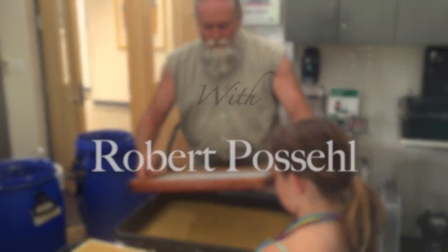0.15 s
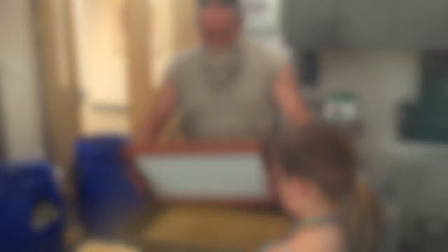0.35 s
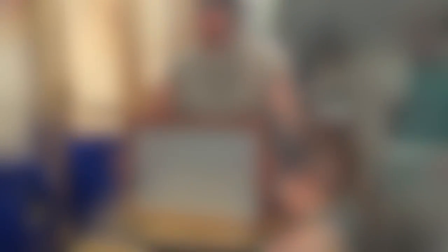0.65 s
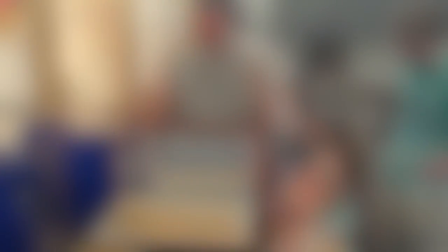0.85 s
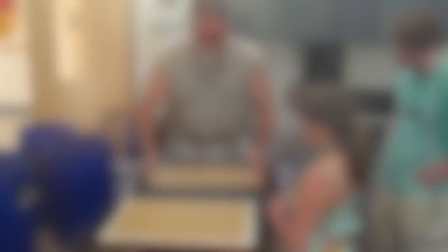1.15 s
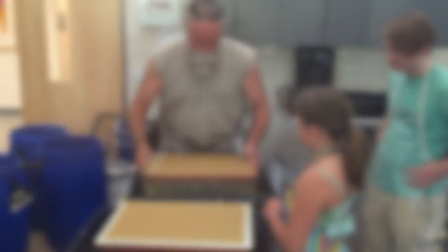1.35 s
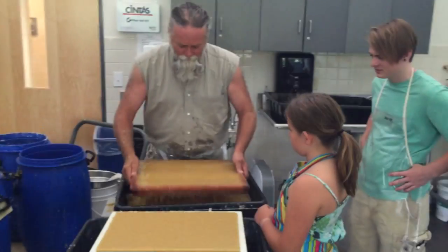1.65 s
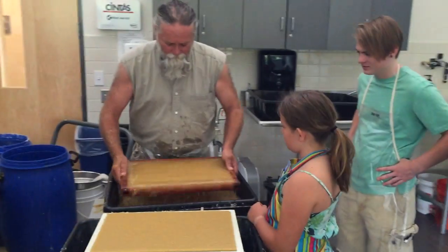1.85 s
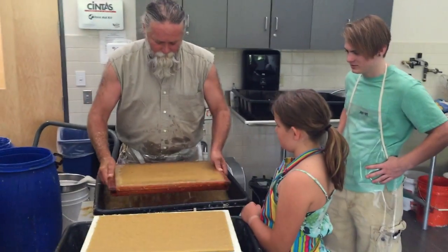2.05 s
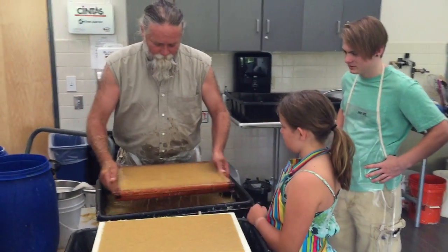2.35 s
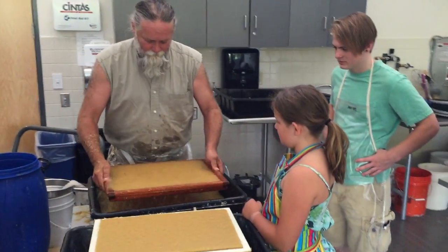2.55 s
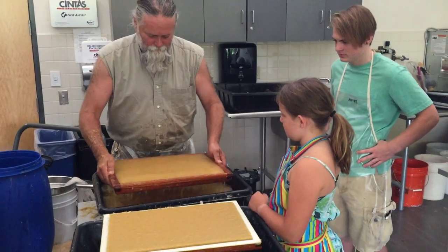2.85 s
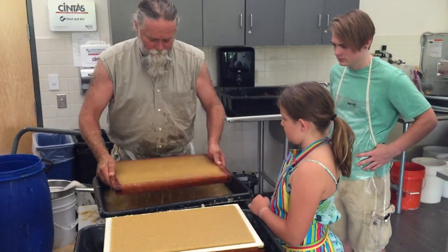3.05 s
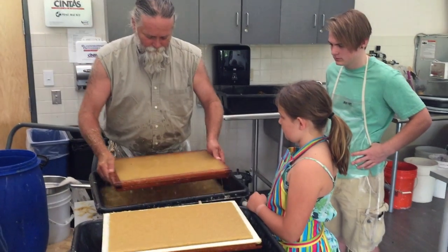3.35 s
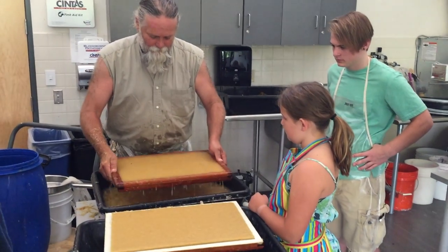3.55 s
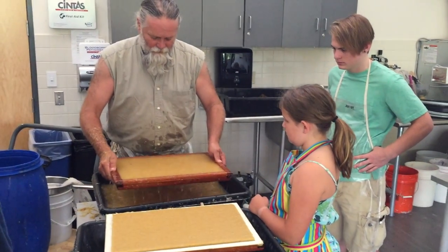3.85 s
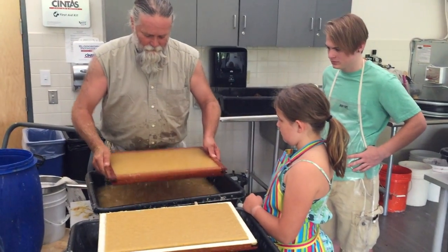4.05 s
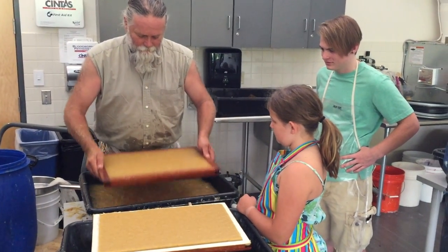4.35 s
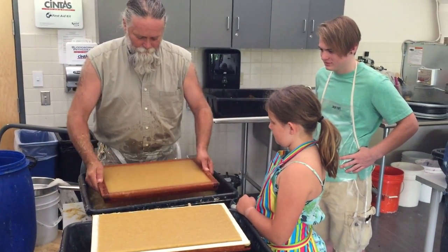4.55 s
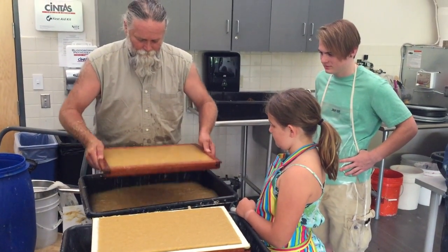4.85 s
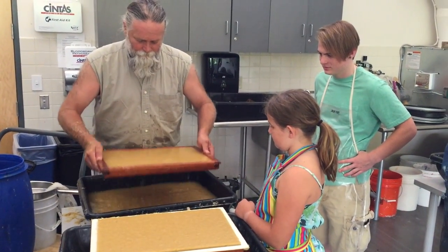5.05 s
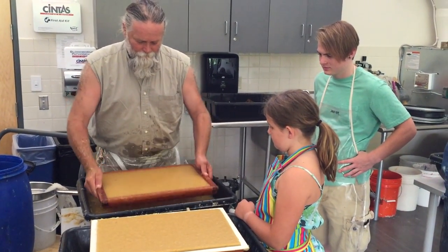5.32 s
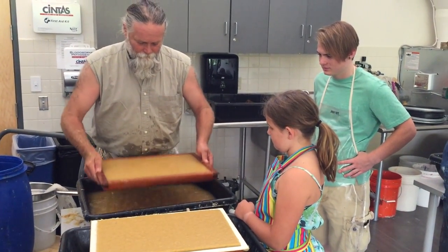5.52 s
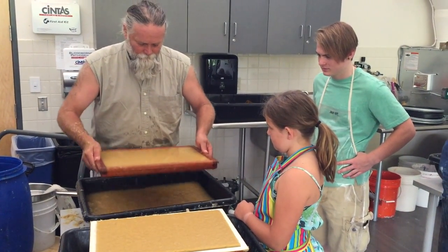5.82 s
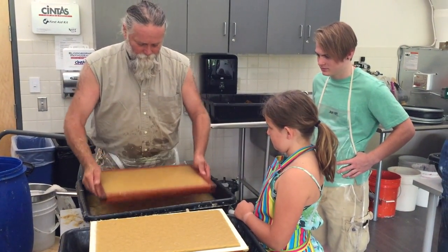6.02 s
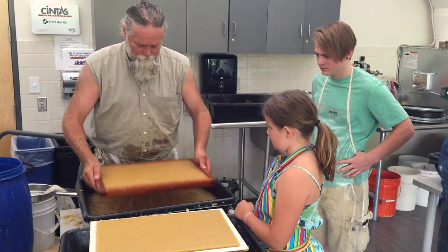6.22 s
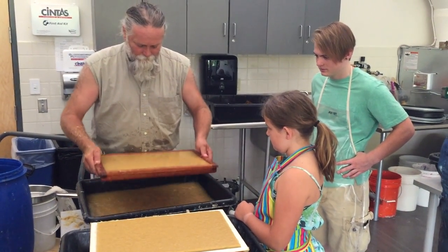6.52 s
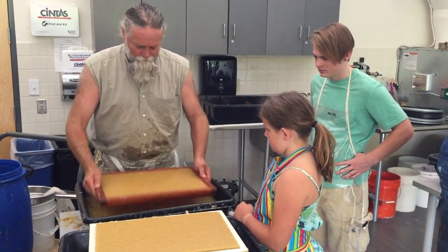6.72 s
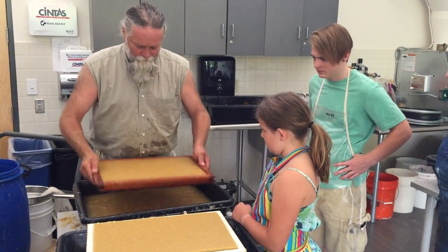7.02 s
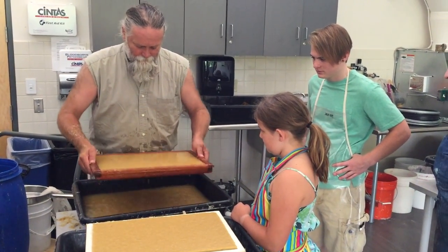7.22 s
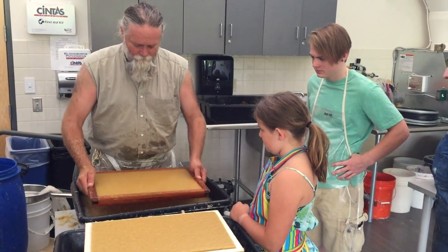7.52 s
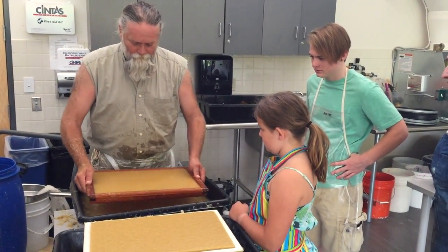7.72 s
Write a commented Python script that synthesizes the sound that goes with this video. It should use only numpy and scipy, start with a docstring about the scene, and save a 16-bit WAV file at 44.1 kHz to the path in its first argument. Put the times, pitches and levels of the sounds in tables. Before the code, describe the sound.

After near silence, a wooden papermaking frame comes up out of a plastic vat and water streams back in, bubbly and bright with fine spray and a few low gulps. The pour soon breaks into trickles and ringing drops, then sparse splashes with each shake, separated by quiet drips. Close microphone, small hard-walled workroom with short reverberation, faint low ventilation rumble and hiss.

```python
"""Papermaking mould over a vat

A papermaker's wooden mould is lifted out of a plastic vat of pulp in a hard-walled workroom.
Water streams back into the vat, then thins to a trickle: ringing bubbles babble, fine spray ticks.
Each shake of the frame throws off one more splash, made of extra bubbles and spray.
Single drops plink as lone bubbles, flat slaps crack as noise with a broad resonance.
Under it all, coloured noise makes a low ventilation rumble and a faint hiss."""
import sys
import numpy as np
from scipy import signal
from scipy.fft import rfft, irfft
from scipy.io import wavfile
from scipy.ndimage import uniform_filter1d

SR = 44100
rng = np.random.default_rng(int(sys.argv[2]) if len(sys.argv) > 2 else 0)


def inscribe(sig):
    """Save sig as 16-bit PCM at rate SR to the path in sys.argv[1].

    A 1-D sig is mono; a 2-D sig holds one channel per row.
    Samples are clipped to [-1, 1] before scaling.
    """
    pcm = np.round(np.clip(np.atleast_2d(sig).T, -1, 1) * 32767)
    wavfile.write(sys.argv[1], SR, pcm.astype(np.int16))


N = 347457  # length in samples

# All levels in the tables are before the gains of the final mix.

# Colour of the ventilation noise. Each row: frequency in Hz, relative level in dB per Hz.
VENTILATION_COLOUR = [(22, -27), (40, -6), (62, 0), (85, -1), (130, 3.5), (260, 0.5), (340, -6),
                      (450, -12.5), (900, -15), (2000, -16.5), (4000, -20), (8000, -25), (10500, -28),
                      (15500, -28)]
VENTILATION_DB, FADE_IN_S, FADE_POWER = -57.5, 1.03, 1.5

# Drops that trap one clear bubble. Each row: start in seconds, pitch in Hz, peak level in dB,
# time to fade by 60 dB in seconds.
DROPS = [(0.29, 1308, -54, 0.071), (0.388, 2990, -40.5, 0.016), (0.534, 1660, -29, 0.021),
         (0.633, 1560, -33.5, 0.023), (0.725, 1115, -42, 0.14), (0.843, 1140, -21, 0.027),
         (0.949, 1086, -21, 0.033), (0.987, 830, -18.5, 0.036), (1.174, 2180, -24.5, 0.029),
         (1.218, 1100, -22.5, 0.019), (1.241, 1520, -24, 0.027), (1.249, 2040, -19, 0.017),
         (1.293, 1275, -25, 0.03), (1.392, 2250, -23, 0.04), (1.426, 1440, -21.5, 0.029),
         (1.468, 2510, -11.5, 0.012), (1.509, 1666, -23.5, 0.037), (1.678, 2890, -24, 0.022),
         (1.751, 2200, -22.5, 0.05), (1.779, 1093, -16.5, 0.024), (1.892, 850, -23, 0.035),
         (1.987, 2130, -26, 0.035), (2.045, 1506, -23, .028), (2.066, 827, -20.5, 0.024),
         (2.212, 2370, -27, 0.057), (2.238, 1095, -25.5, 0.038), (2.284, 1856, -21, 0.032),
         (2.286, 2900, -24.5, 0.023), (2.335, 860, -29, 0.047), (2.349, 2210, -26, 0.027),
         (2.442, 3020, -29, 0.028), (2.461, 870, -29.5, 0.04), (2.527, 2760, -18, 0.014),
         (2.575, 869, -32, 0.066), (2.63, 1238, -33, 0.067), (2.682, 1600, -23.5, 0.025),
         (2.753, 2830, -29, 0.022), (2.797, 1250, -31.5, 0.051), (2.866, 1596, -20, 0.025),
         (2.893, 850, -30, 0.037), (2.906, 2230, -31, 0.018), (2.932, 745, -32.5, 0.062),
         (2.952, 1670, -32, 0.03), (2.995, 1500, -31, 0.033), (3.031, 3210, -27, .018),
         (3.06, 1474, -33, 0.1), (3.083, 1420, -38, 0.025), (3.083, 3650, -35, 0.018),
         (3.105, 1235, -31, 0.043), (3.135, 1520, -27.5, 0.037), (3.165, 887, -29.5, 0.039),
         (3.166, 2770, -28, 0.039), (3.258, 1760, -26.5, 0.033), (3.288, 2840, -31, .02),
         (3.365, 1180, -29, 0.026), (3.403, 1010, -27.5, 0.037), (3.516, 1785, -32.5, 0.034),
         (3.549, 1700, -30, 0.047), (3.578, 2950, -33, .018), (3.586, 990, -44, 0.35),
         (3.59, 1616, -25, 0.039), (3.664, 1600, -33, 0.023), (3.695, 2960, -28, 0.027),
         (3.717, 1845, -26.5, 0.032), (3.765, 1406, -30.5, 0.073), (3.81, 856, -31, 0.09),
         (3.818, 3920, -29.5, 0.019), (3.873, 3230, -23, 0.011), (3.95, 3620, -36.5, 0.032),
         (3.88, 722, -46, 0.37), (3.893, 1340, -30, 0.057), (3.916, 1270, -27, 0.038),
         (4.036, 1274, -38.5, 0.24), (4.078, 3470, -32, .018), (4.088, 1565, -27, 0.032),
         (4.117, 990, -26.5, 0.03), (4.132, 850, -23.5, 0.026), (4.174, 2900, -23.5, 0.015),
         (4.259, 4100, -30, 0.015), (4.275, 1410, -19, 0.01), (4.163, 1200, -33.5, 0.065),
         (4.331, 1000, -33, .09), (4.395, 887, -48, 0.083), (4.287, 985, -24, 0.032),
         (4.363, 926, -37.5, 0.14), (4.436, 1750, -28, 0.024), (4.452, 2230, -33, 0.019),
         (4.472, 2730, -38.5, 0.015), (4.519, 890, -48.5, 0.14), (4.911, 2760, -31, 0.01),
         (4.953, 2540, -34.5, 0.017), (5.056, 1360, -43.5, 0.024), (5.089, 1920, -36, 0.032),
         (5.094, 1405, -35.5, 0.024), (5.104, 3000, -34, 0.0094), (5.154, 1856, -34.5, 0.055),
         (5.165, 1190, -30.5, 0.017), (5.176, 1180, -29.5, 0.022), (5.186, 986, -36, 0.11),
         (5.227, 2590, -37, 0.028), (5.232, 1290, -32, 0.047), (5.24, 1030, -38, 0.12),
         (5.247, 1217, -23.5, 0.027), (5.253, 1630, -36, 0.018), (5.255, 2540, -39.5, 0.019),
         (5.262, 1440, -27.5, .022), (5.268, 1156, -31, 0.054), (5.293, 3350, -37.5, 0.037),
         (5.305, 1210, -33.5, 0.026), (5.425, 830, -38, 0.11), (5.455, 3340, -30.5, .018),
         (5.492, 3960, -30, 0.017), (5.619, 1760, -30, 0.028), (5.646, 1780, -29, 0.017),
         (5.91, 1005, -46, 0.055), (5.997, 1680, -37.5, 0.026), (6.101, 1017, -44.5, 0.13),
         (6.1, 1464, -42, 0.046), (6.1114, 3215, -27.5, 0.02), (6.191, 886, -37, 0.039),
         (6.209, 880, -34, 0.027), (6.231, 3080, -30.5, 0.032), (6.244, 1550, -28, 0.024),
         (6.253, 828, -31.5, 0.04), (6.332, 1260, -29, 0.036), (6.374, 1560, -35, 0.037),
         (6.418, 1610, -34.5, 0.017), (6.698, 1304, -32, 0.022), (6.754, 1240, -33.5, 0.019),
         (6.82, 1645, -39.5, 0.052), (6.905, 2270, -42, .024), (6.92, 2310, -31, 0.022),
         (6.928, 4080, -31.5, 0.018), (6.933, 1740, -28.5, 0.021), (6.946, 975, -33.5, 0.052),
         (6.949, 4300, -33, 0.018), (6.978, 3300, -27, 0.018), (7.028, 1570, -35, .03),
         (6.993, 1165, -29, 0.025), (7.078, 3370, -37, 0.02), (7.093, 1836, -39, 0.065),
         (7.11, 1770, -39, 0.033), (7.126, 2285, -34, 0.035), (7.157, 2240, -26.5, 0.012),
         (7.228, 1080, -40.5, 0.014), (7.296, 3830, -39, 0.016), (7.328, 1276, -46, 0.051),
         (7.381, 1558, -41, 0.049), (7.474, 1560, -34, 0.066), (7.483, 2930, -34, 0.017),
         (7.492, 3880, -34, 0.017), (7.502, 1250, -31, 0.069), (7.663, 2180, -34, 0.031),
         (7.675, 1750, -31, 0.021), (7.692, 810, -26, 0.033), (7.715, 1930, -23.5, 0.023),
         (7.757, 795, -32, 0.032), (7.794, 1190, -38, 0.03)]
# Most bubbles in a cloud hold their pitch roughly, a few more rise than sink:
# mean rise as a share of the spread.
RISE_BIAS = 0.15
# Droplets thrown up by a drop: latest return, pitch range above it, relative level, ring.
SPLASHBACK_S, SPLASHBACK_OCTAVES, SPLASHBACK_DB, SPLASHBACK_T60_S = 0.022, 1.1, -19, 0.0063
# A drop ticks on the surface as it lands: level and brightness relative to its bubble.
TOUCH_DB, TOUCH_PITCH_RATIO = -12, 1.18

# Blobs of water slapping the surface, the small ones brightest. Each row: start in seconds,
# level in dB, brightest frequency in Hz.
SLAPS = [(0.3875, -48, 2800), (0.407, -48, 2000), (0.431, -53, 5200), (0.5335, -37, 1700),
         (0.8435, -20, 1060), (0.87, -33, 5570), (0.944, -26.5, 6050), (0.9487, -15, 1050),
         (0.9752, -21.5, 4600), (1.175, -29, 2150), (1.2165, -17.5, 1060), (1.261, -20, 6100),
         (1.4235, -19, 3500), (1.424, -25, 12900), (1.4975, -24, 9600), (1.7435, -14, 1940),
         (1.891, -40, 4300), (1.9111, -19.5, 6200), (1.927, -25, 12900), (2.7813, -19, 2970),
         (3.0561, -18.5, 1490), (3.1295, -16.5, 2400), (3.1552, -26.5, 8700), (3.185, -21.5, 1900),
         (3.4017, -18.5, 1460), (3.402, -26.5, 7300), (3.564, -34, 6560), (3.695, -30, 5430),
         (3.82, -32.5, 4080), (4.02, -30, 1090), (4.021, -31, 3170), (4.0648, -26, 6640),
         (4.153, -30, 14000), (4.246, -31, 14500), (4.4345, -25.5, 1730), (4.661, -25, 2300),
         (5.134, -32.5, 8450), (5.229, -44, 1400), (5.247, -38, 1800), (5.263, -34.5, 9200),
         (5.4038, -31, 4550), (5.4186, -24.5, 13700), (6.102, -41, 4670), (6.1025, -36, 1300),
         (6.112, -35.5, 3400), (6.1852, -37, 9000), (6.2297, -25, 2200), (6.331, -37, 2980),
         (6.407, -36, 4770), (6.756, -55, 1890), (6.821, -54, 2000), (7.273, -38.5, 9000),
         (7.474, -34.5, 2600), (7.4919, -35.5, 3800), (7.503, -37, 2700), (7.644, -29, 3640),
         (7.6915, -34, 2100), (7.716, -24, 3020), (7.7608, -26.5, 8000)]
# Small bright drops crack with a clearer pitch. Each row: frequency in Hz,
# factor on the sharpness of the resonance (no unit).
CRACK_SHARPENING = [(1500, 1.32), (6200, 0.9), (8400, 5.4)]

# The unbroken stream swells as the mould comes up, then runs out. Each row: time in seconds,
# bubble level in dB, spray level in dB, commonest bubble pitch in Hz.
STREAM = [(0.378, -61.5, -80.5, 1490), (0.53, -56, -72, 1510), (0.719, -51.5, -62, 1040),
          (0.82, -50, -73, 990), (0.959, -39, -48, 960), (1.17, -38, -47.5, 1970),
          (1.39, -36.5, -42.5, 1900), (1.599, -33.5, -40.5, 2000), (1.71, -37.5, -43.5, 1780),
          (1.83, -34.5, -39.5, 1500), (1.87, -37.5, -41.5, 1260), (2.04, -35.5, -40, 1810),
          (2.17, -40, -48, 1790), (2.52, -37.5, -44, 1600), (2.679, -42.5, -51.5, 1330),
          (2.82, -41.5, -43.5, 1450), (2.92, -36.5, -49.5, 1550), (3.02, -42.5, -50.5, 1560),
          (3.33, -46.5, -53, 1600), (3.44, -36.5, -45, 1540), (3.52, -48, -52, 1700), (4.0, -59, -61, 1400)]
# The stream falls in uneven gouts; the spray takes a share of that swing.
GOUTS_PER_S, GOUT_DB, SPRAY_FOLLOWS = 29, 1.5, 0.59
# Each tilt or shake of the frame throws a slop of water into the vat. Each row: start in seconds,
# bubble level in dB, spray level in dB, attack in seconds, hold in seconds, bubble pitch in Hz.
SLOPS = [(1.237, -34, -46.5, 0.018, 0.039, 1710), (1.411, -33.5, -43, 0.015, 0.02, 1900),
         (1.494, -31.5, -43, 0.015, 0.035, 1650), (1.733, -30.5, -40, 0.013, 0.04, 1850),
         (1.887, -34.5, -41, 0.013, 0.04, 1000), (1.971, -32.5, -40.5, 0.016, 0.065, 1900),
         (2.177, -34.5, -41.5, 0.058, 0.071, 1820), (2.814, -36.5, -46.5, 0.065, 0.038, 1750),
         (3.098, -29, -40.5, 0.059, 0.042, 1710), (3.351, -41, -48.5, 0.057, 0.011, 1390),
         (3.655, -38.5, -50, 0.064, 0.15, 1560), (4.026, -37.5, -46, 0.046, 0.14, 1060),
         (4.223, -36, -46.5, 0.042, 0.082, 1190), (4.63, -34, -44.5, 0.082, 0.043, 1470),
         (5.204, -44, -60, 0.028, 0.016, 1300), (5.367, -38, -45, 0.079, 0.11, 1220),
         (6.196, -36.5, -47, 0.034, 0.08, 1570), (6.895, -39, -42.5, 0.082, 0.014, 1640),
         (7.05, -50, -59, 0.036, 0.015, 2100), (7.615, -35, -39.5, 0.079, 0.0085, 1930)]
SLOP_FALL_DB_PER_S, SPRAY_FALL_DB_PER_S = 137.5, 113.5
SLOP_RISE_OCTAVES_PER_S = 0.29  # big bubbles come first, smaller ones after
LUMPS_PER_S, LUMP_DB = 55, 2.0  # a slop lands in ragged lumps
# The sheet of water breaks into strands: fewer bubbles from then on.
BREAKUP_S, BREAKUP_LENGTH_S = 1.9, 0.2
# Basic bubble rates; each cloud scales them for itself.
SHEET_BUBBLES_PER_S, STRAND_BUBBLES_PER_S, SLOP_BUBBLES_PER_S = 7500, 1700, 2200

# Size of the babbling bubbles by pitch. Each row: pitch in Hz, relative level in dB.
BABBLE_SIZES = [(500, -3.5), (740, -6.5), (860, -2.5), (1200, 2.5), (1700, 4.5), (2300, 3.5), (3200, 7),
                (4400, 0)]
# The less water is left on the mould, the smaller its largest bubbles: lowest pitch and its rise.
LARGEST_BUBBLE_HZ, LARGEST_RISE_HZ_PER_S = 525, 53.4
# Each gout traps a clump of bubbles of like size.
CLUMPS_PER_S, CLUMP_OCTAVES = 35, 0.27
# Short pats of the ragged water hitting the surface. Each row: pitch in Hz, relative level in dB.
SPLATTER_SIZES = [(900, -11.5), (1400, 0), (2000, 2.5), (3200, -0.5), (4300, -8)]
# Tiny bubbles raised by the spray. Each row: pitch in Hz, relative level in dB.
FIZZ_SIZES = [(3400, -4), (4300, 5), (4900, 0), (6400, 5), (7600, 2), (8700, 7.5), (9800, -1), (10600, 0.5),
              (12000, 0.5), (15000, 4)]
# Colour of the spray. Each row: frequency in Hz, relative level in dB per Hz.
SPRAY_COLOUR = [(500, -31), (900, -48), (1900, 12), (3000, 8.5), (4200, 5), (4900, 2), (5500, 1.5),
                (6700, 2.5), (7600, -2), (8700, 0.5), (9900, 0.5), (10500, -11), (11800, -3), (15500, -7)]
# Stray drops in the running water; most of their peaks stand above its level.
STRAYS_PER_S, STRAY_DB, STRAY_SPREAD_DB, STRAY_CYCLES = 8.5, 3.0, -2, 56
STRAY_LOW_HZ, STRAY_HIGH_HZ = 764, 2650

# Water washes over the rim as the mould breaks the surface. Each row: time in seconds, level in dB.
WASH_LEVEL = [(0.4, -72.5), (0.51, -56.5), (0.56, -53), (0.68, -55.5), (0.74, -46), (0.82, -52.5),
              (0.86, -42.5), (0.92, -53), (0.98, -40), (1.2, -47.5)]
# The many faint bubbles in the wash. Each row: pitch in Hz, relative level in dB.
WASH_SIZES = [(330, -4), (600, -11), (1100, 0.5), (2100, 2), (3000, -7)]
# The thick early stream drags big air pockets under. Each row: time in seconds, level in dB.
CHURN_LEVEL = [(0.5, -74), (0.75, -52.5), (1.05, -41.5), (1.22, -48.5), (1.7, -48.5), (1.83, -41),
               (1.93, -43.5), (2.05, -50.5), (2.3, -57)]
# Size of these air pockets. Each row: pitch in Hz, relative level in dB.
POCKET_SIZES = [(140, -8), (200, -8.5), (250, 2.5), (290, 5), (340, -0.5), (420, -5.5), (540, -5),
                (720, 11)]
SLOP_CHURN_DB = -25  # a slop drags down only a few air pockets, relative to its bubbles
# Low gulps and dull bumps of water against frame and vat. Each row: start in seconds, pitch in Hz,
# peak level in dB, time to fade by 60 dB in seconds.
GULPS = [(0.52, 388, -44, 0.12), (0.572, 350, -40, 0.098), (0.7, 168, -28, 0.057), (0.738, 562, -37, 0.18),
         (0.775, 413, -38.5, 0.13), (1.02, 221, -12, 0.06), (1.029, 286, -21, 0.097),
         (1.2, 243, -32, 0.087), (1.34, 252, -29, 0.1), (1.585, 500, -32.5, 0.054),
         (1.785, 330, -33, 0.042), (1.86, 68, -39, .14), (1.892, 505, -28, 0.067),
         (1.91, 262.4, -29.5, 0.12), (1.965, 280, -47, 0.076), (2.045, 470, -39.5, 0.072),
         (2.12, 200, -31.5, 0.08), (2.21, 295, -32.5, 0.066), (3.172, 283, -31, 0.058),
         (4.89, 76, -40.5, 0.081), (6.545, 123, -20, 0.025), (6.655, 118, -24.5, 0.061),
         (6.72, 70, -40, .15), (6.719, 208, -18, 0.02), (7.746, 168, -9.5, 0.02)]
# The water in the vat keeps sloshing under the trickle. Each row: time in seconds, level in dB.
SLOSH_LEVEL = [(1.0, -66.5), (1.9, -56.5), (2.7, -59.5), (3.3, -62.5), (3.9, -62.5), (4.8, -69), (6.0, -72),
               (7.9, -70)]
# Its low, dull gurgles. Each row: pitch in Hz, relative level in dB.
SLOSH_SIZES = [(110, 4.5), (180, -7), (260, 8.5), (340, 3.5), (430, -9), (560, 4)]
# Large bubbles ring on under the strands and overlap. Each row: time in seconds, level in dB.
RINGING_LEVEL = [(1.9, -53.5), (2.3, -44.5), (2.9, -49.5), (3.25, -44.5), (3.33, -52), (3.42, -49),
                 (3.62, -56), (3.8, -43), (3.92, -44), (4.0, -57), (4.13, -45), (4.36, -43.5), (4.48, -61)]
# Their size by pitch. Each row: pitch in Hz, relative level in dB.
RINGING_SIZES = [(700, -4), (870, 4), (1100, -6), (1550, 7), (1900, 4), (2400, 1)]
# Bubbles that bob up to the surface and glide upward. Each row: start in seconds, pitch in Hz,
# peak level in dB, time to fade by 60 dB in seconds, rise as a share of the pitch.
BLOOPS = [(2.469, 1860, -19.5, 0.031, 0.46), (2.568, 1245, -22.5, 0.028, .3),
          (2.856, 3000, -20, 0.019, 0.44), (4.316, 1170, -31.5, 0.051, 0.35),
          (4.347, 2140, -27, 0.032, 0.27), (4.66, 1870, -16.5, 0.022, 0.33),
          (6.973, 2130, -31, 0.025, 0.41)]

# First echoes off the vat walls and the underside of the mould. Each row: delay in seconds,
# level in dB.
ECHOES = [(.0023, -74), (.0041, -32), (.0058, -32), (.0081, -41), (0.0116, -13.5)]
# Decay of the room. Each row: frequency in Hz, time to fade by 60 dB in seconds.
ROOM_T60 = [(150, 0.3), (1200, 0.26), (4000, 0.27), (12000, 0.26)]
CUTOFF_HZ = 15600


def from_db(db):
    """Turn decibels into a gain."""
    return 10 ** (np.asarray(db) / 20)


def rms_one(x):
    """Scale to an rms of 1."""
    return x / np.sqrt(np.mean(x ** 2) + 1e-20)


def level(rows, axis=1):
    """One dB column of a curve as a gain per sample, all but silent outside its span."""
    rows = np.array(rows)
    return from_db(np.interp(np.arange(N) / SR, rows[:, 0], rows[:, axis], left=-140, right=-140))


def at_hz(points, hz):
    """Read a table on a log-frequency axis."""
    points = np.array(points)
    return np.interp(np.log(np.maximum(hz, 1)), np.log(points[:, 0]), points[:, 1])


def colour(x, spectrum):
    """Filter with the given spectrum, unit energy and no sound ahead of its cause (minimum phase)."""
    size = 8192
    cepstrum = irfft(np.log(from_db(at_hz(spectrum, np.fft.rfftfreq(size, 1 / SR)))))
    # folding the cepstrum gives the minimum-phase response
    cepstrum[1:size // 2] *= 2
    cepstrum[size // 2 + 1:] = 0
    response = irfft(np.exp(rfft(cepstrum)))
    return signal.fftconvolve(x, response / np.linalg.norm(response))[:N]


def highpass(x, order, hz):
    """Take away the bass below a frequency."""
    return signal.sosfilt(signal.butter(order, hz, "high", fs=SR, output="sos"), x)


def add(out, s, sound):
    """Mix a sound in at time s."""
    start = min(int(abs(s) * SR), N - 1)
    out[start:start + len(sound)] += sound[:N - start]


def follow(x, gain, window_s):
    """Give a cloud of grains the wanted level, keeping its faster grain."""
    size = max(int(window_s * SR), 8)
    power = uniform_filter1d(uniform_filter1d(x ** 2, size), size)
    floor = np.mean(x ** 2) / 100  # keeps sparse stretches from being blown up
    return gain * x / np.sqrt(np.abs(power) + floor)


def wander(per_s):
    """A random swing around zero, with a new value so many times a second."""
    knots = rng.standard_normal(1000)
    return np.interp(np.arange(N) / SR * per_s, np.arange(len(knots)), knots)


def impacts(rate, spread_db):
    """Random impacts at a rate per second, mostly small and a few large: sample positions and sizes."""
    at = np.flatnonzero(rng.random(N) < rate / SR)
    sizes = from_db(spread_db * np.minimum(rng.exponential(1, N), 4))
    return at, sizes[at]


def ventilation(waver_db):
    """A faint even hiss over a low rumble that wavers; it fades in at the start."""
    air = rms_one(colour(rng.standard_normal(N), VENTILATION_COLOUR))
    rumble = signal.sosfilt(signal.butter(1, 200, fs=SR, output="sos"), air)
    fade = np.minimum(np.arange(N) / SR / FADE_IN_S, 1) ** FADE_POWER
    waver = from_db(waver_db * wander(per_s=12)) - 1
    return from_db(VENTILATION_DB) * fade * (air + rumble * waver)


def bubble(hz, t60, rise, swell_cycles=2.6):
    """A bubble pinches off and rings; its pitch rises near the surface or sinks as it is pushed under."""
    t = np.arange(int(max(t60, .002) * SR)) / SR
    swell = 1 - np.exp(-hz * t / swell_cycles)
    decay = np.exp(-np.log(1000) * t / t60)
    pitch = hz * (1 + rise * (.5 - np.exp(-5 * t / t60)))
    return swell * decay * np.sin(2 * np.pi * np.cumsum(pitch) / SR)


def plinks(rows, bend, attack_s=0.0016, shiver=0.37, shiver_per_s=220):
    """Single bubbles that stand out: each swells briefly, bends its own way and shivers as it rings."""
    out = np.zeros(N)
    for s, hz, peak_db, t60 in rows:
        ring = bubble(hz, t60, bend * (rng.uniform(-1.3, 1) + RISE_BIAS))
        t, knots = np.arange(len(ring)) / SR, rng.standard_normal(size=64)
        swing = np.interp(t * shiver_per_s, np.arange(len(knots)), knots)
        wobble = 1 + shiver * swing * np.sqrt(t / t60) * 2  # grows as the bubble rings
        attack = 1 - np.exp(-(t / attack_s) ** 2)
        add(out, s, from_db(peak_db) * ring * wobble * attack)
    return out


def splashback(bend):
    """Each drop throws up a few droplets that fall back just after it, weaker and higher in pitch."""
    rows = []
    for s, hz, peak_db, _ in DROPS:
        for when, size in rng.random(size=(3, 2)):
            droplet_hz = hz * 2 ** (SPLASHBACK_OCTAVES * size)
            rows.append((s + SPLASHBACK_S * when, droplet_hz, peak_db + SPLASHBACK_DB, SPLASHBACK_T60_S))
    return plinks(rows, bend)


def slaps(rows, t60, sharpness, attack_s):
    """Water lands flat: a short crack with little bass and a broad resonance, clearest at the top."""
    out, t = np.zeros(N), np.arange(SR // 20) / SR
    shape = (1 - np.exp(-t / attack_s)) * np.exp(-np.log(1000) * t / t60)
    for s, level_db, hz in rows:
        peak = signal.iirpeak(min(hz, SR / 3), sharpness * at_hz(CRACK_SHARPENING, hz), fs=SR)
        once = signal.lfilter(*peak, rng.standard_normal(len(t)))
        crack = signal.lfilter(*peak, once)
        add(out, s, from_db(level_db) * rms_one(crack) * shape)
    return highpass(out, 3, 750)


def drop_touches():
    """Each drop ticks softly on the surface as it lands, a little brighter than its bubble."""
    rows = [(s, peak_db + TOUCH_DB, hz * TOUCH_PITCH_RATIO) for s, hz, peak_db, _ in DROPS]
    return slaps(rows, t60=0.041, sharpness=1.5, attack_s=0.0053)


def slop(s, attack_s, hold_s, fall_db_per_s):
    """Gain of one slop over time: its first drops land, the bulk pours for a moment and dies away."""
    t = np.arange(N) / SR - s
    rise = np.clip(t / attack_s, 0, 1)
    fall = from_db(-fall_db_per_s * np.clip(t - attack_s - hold_s, 0, 1))
    return rise * rise * (2 - rise) * fall


def water():
    """Powers of stream and slops add up: bubble gain, spray gain, commonest pitch, share of the slops."""
    t = np.arange(N) / SR
    times, *_, stream_hz = np.transpose(STREAM)
    gouts = from_db(GOUT_DB * wander(GOUTS_PER_S))
    stream = (level(STREAM, axis=1) * gouts) ** 2
    mist = (level(STREAM, axis=2) * gouts ** SPRAY_FOLLOWS) ** 2
    lumps = from_db(LUMP_DB * wander(LUMPS_PER_S))
    flow, pitch = stream, stream * np.interp(t, times, stream_hz)  # pitch is weighted by power
    for s, bubbles_db, spray_db, attack_s, hold_s, hz in SLOPS:
        bubble_shape = slop(s, attack_s, hold_s, SLOP_FALL_DB_PER_S)
        power = (from_db(bubbles_db) * lumps * bubble_shape) ** 2
        flow = flow + power
        octaves = SLOP_RISE_OCTAVES_PER_S * np.clip(t - s - attack_s, 0, .5)
        pitch = pitch + power * hz * 2 ** octaves
        spray_shape = slop(s, attack_s, hold_s, SPRAY_FALL_DB_PER_S)
        mist = mist + (from_db(spray_db) * lumps ** SPRAY_FOLLOWS * spray_shape) ** 2
    return np.sqrt(flow), np.sqrt(mist), pitch / flow, 1 - stream / flow


def bubble_rate(slop_share):
    """Basic bubble rate: many under the sheet, few under its strands, more again in a slop."""
    sheet = .5 - .5 * np.tanh((np.arange(N) / SR - BREAKUP_S) / BREAKUP_LENGTH_S)
    broken = STRAND_BUBBLES_PER_S * (1 - slop_share) + SLOP_BUBBLES_PER_S * slop_share
    return sheet * SHEET_BUBBLES_PER_S + (1 - sheet) * broken


def bubble_cloud(gain, sizes, per_s, spread_db, cycles, bend, window_s, favour=None):
    """Bubbles of all sizes, more in a stronger flow; favour(at, pitches) weights the sizes over time."""
    out, draws = np.zeros(N), rng.random((N, 3))
    low, high = sizes[0][0], sizes[-1][0]
    at, strengths = impacts(per_s * np.sqrt(gain / gain.max()), spread_db)
    pitches = low * (high / low) ** draws[at, 0]
    rings = cycles * (.5 + draws[at, 1]) / pitches
    rises = bend * (2 * draws[at, 2] - 1 + RISE_BIAS)
    strengths = strengths * from_db(at_hz(sizes, pitches))
    if favour:
        strengths = strengths * favour(at, pitches)
    for i, hz, t60, rise, strength in zip(at, pitches, rings, rises, strengths):
        add(out, i / SR, strength * bubble(hz, t60, rise))
    return follow(out, gain, window_s)


def strand_sizes(at, pitches, common_hz, common_db=6, octaves=0.4):
    """A strand of water favours one bubble size and makes hardly any bubbles above a size limit."""
    lowest = LARGEST_BUBBLE_HZ + LARGEST_RISE_HZ_PER_S * at / SR
    bump = from_db(common_db * np.exp(-(np.log2(pitches / common_hz[at]) / octaves) ** 2))
    return bump / np.sqrt(1 + (lowest / pitches) ** 20)


def babble(flow, common_hz, density):
    """The running water traps ringing bubbles in clumps of like size."""
    clump_hz = common_hz * 2 ** (CLUMP_OCTAVES * wander(CLUMPS_PER_S))
    return bubble_cloud(flow, BABBLE_SIZES, per_s=density, spread_db=4.5, cycles=65, bend=0.14,
                        window_s=0.029, favour=lambda at, pitches: strand_sizes(at, pitches, clump_hz))


def splatter(flow):
    """Ragged water pats the surface in bursts of short-ringing bubbles with little bass."""
    bursts = from_db(2.3 * wander(per_s=67))
    pats = bubble_cloud(flow, SPLATTER_SIZES, per_s=1400, spread_db=3.0, cycles=12.6, bend=0.19,
                        window_s=0.12)
    return highpass(bursts * pats, 4, 930)


def fizz(mist, density):
    """Falling spray raises tiny, high-pitched bubbles."""
    return bubble_cloud(mist, FIZZ_SIZES, per_s=1.9 * density, spread_db=4.2, cycles=110, bend=0.025,
                        window_s=0.033)


def spray(gain, per_s, spread_db, window_s):
    """Fine droplets tick on the surface: random clicks given the colour of spray."""
    clicks, signs = np.zeros(N), rng.choice([-1, 1], N)
    at, strengths = impacts(per_s * np.sqrt(gain / gain.max()), spread_db)
    clicks[at] = strengths * signs[at]
    return follow(colour(clicks, SPRAY_COLOUR), gain, window_s)


def stray_drops(flow, bend):
    """Drops at random times and pitches ring out around or a little above the running water."""
    draws = rng.random((int(STRAYS_PER_S * N / SR), 4))
    at = (draws[:, 0] * N).astype(int)
    hz = STRAY_LOW_HZ * (STRAY_HIGH_HZ / STRAY_LOW_HZ) ** draws[:, 1]
    peak_db = 20 * np.log10(flow[at]) + STRAY_DB + STRAY_SPREAD_DB * (2 * draws[:, 2] - 1)
    t60 = STRAY_CYCLES * (.5 + draws[:, 3]) / hz
    return plinks(zip(at / SR, hz, peak_db, t60), bend)


def wash():
    """Water washing over the rim makes many faint bubbles."""
    return bubble_cloud(level(WASH_LEVEL), WASH_SIZES, per_s=3000, spread_db=2.5, cycles=26, bend=0.097,
                        window_s=0.05)


def gurgle(flow, slop_share):
    """Big air pockets dragged under by the thick stream, and a few by the slops, ring low."""
    churn = level(CHURN_LEVEL) + from_db(SLOP_CHURN_DB) * slop_share * flow
    return bubble_cloud(churn, POCKET_SIZES, per_s=700, spread_db=3.0, cycles=21.0, bend=0.11,
                        window_s=0.33)


def slosh():
    """Water sloshing in the vat gurgles with large, low-pitched bubbles."""
    return bubble_cloud(level(SLOSH_LEVEL), SLOSH_SIZES, per_s=120, spread_db=1.0, cycles=22, bend=0.14,
                        window_s=0.75)


def ringing():
    """Large bubbles under the strands ring for many cycles and overlap."""
    return bubble_cloud(level(RINGING_LEVEL), RINGING_SIZES, per_s=120, spread_db=5.0, cycles=158,
                        bend=0.058, window_s=0.063)


def bloops():
    """Rising bubbles swell slowly and sweep up in pitch."""
    out = np.zeros(N)
    for s, hz, peak_db, t60, rise in BLOOPS:
        add(out, s, from_db(peak_db) * bubble(hz, t60, rise, swell_cycles=6.0))
    return out


def room(x, tail_db, gap_s):
    """Quick echoes between vat walls and mould, then the diffuse ring of the workroom."""
    t = np.arange(SR * 3 // 4) / SR
    edges, tail = np.geomspace(60, 16000, 9), 0
    for low, high in zip(edges, edges[1:]):
        band_filter = signal.butter(2, [low, high], "band", fs=SR, output="sos")
        band = signal.sosfilt(band_filter, rng.standard_normal(len(t)))
        tail = tail + band * np.exp(-np.log(1000) * t / at_hz(ROOM_T60, np.sqrt(low * high)))
    tail = tail * np.clip(t / gap_s - .5, 0, 1)  # the ring sets in around the gap
    response = from_db(tail_db) * tail / np.linalg.norm(tail)
    dull_click = signal.lfilter([.5], [1, -.5], signal.unit_impulse(16))
    for delay, echo_db in ECHOES:
        add(response, delay, from_db(echo_db) * dull_click)
    return x + signal.fftconvolve(x, response)[:N]


def scene():
    """All the water sounds in the vat, heard in the room, over the ventilation."""
    flow, mist, common_hz, slop_share = water()
    density = bubble_rate(slop_share)

    bubbles = from_db(-5.0) * babble(flow, common_hz, density) + from_db(-5.0) * fizz(mist, density)
    bubbles += wash() + from_db(-1.0) * gurgle(flow, slop_share) + slosh() + ringing()
    pats = from_db(-10.0) * splatter(flow)
    patter = from_db(-1.03) * spray(mist, per_s=2.2 * density, spread_db=2.5, window_s=0.08)
    cracks = from_db(-6.5) * slaps(SLAPS, t60=0.032, sharpness=0.77, attack_s=0.0019) + drop_touches()
    pour = bubbles + pats + splashback(bend=0.19) + patter + cracks

    drops = from_db(3.5) * plinks(DROPS, bend=0.036) + stray_drops(flow, bend=0.087)
    drops += plinks(GULPS, bend=0.054) + from_db(3.0) * bloops()

    # single drops land in spots of their own and stir the room differently
    wet = room(pour, tail_db=-12, gap_s=0.0011) + room(drops, tail_db=-7.5, gap_s=0.0043)
    return (wet + ventilation(waver_db=3.6))[None]


def record(dry):
    """The top is cut steeply."""
    return signal.sosfilt(signal.ellip(12, .1, 80, CUTOFF_HZ, fs=SR, output="sos"), dry)


dry = scene()
out = record(dry)
inscribe(out)
```